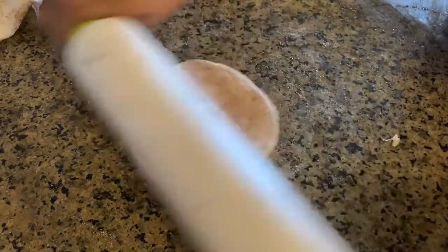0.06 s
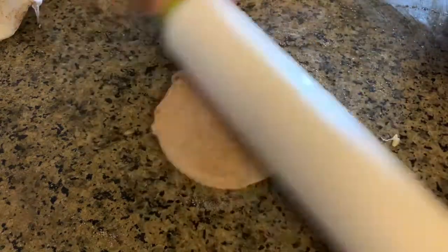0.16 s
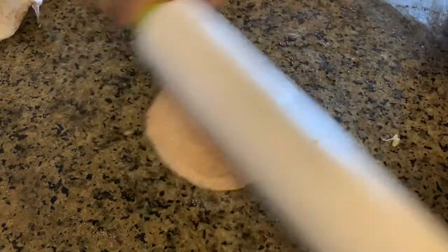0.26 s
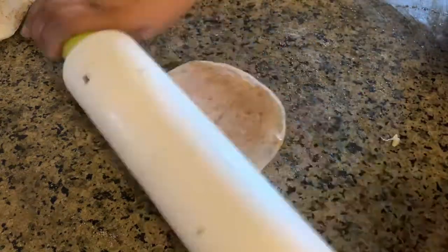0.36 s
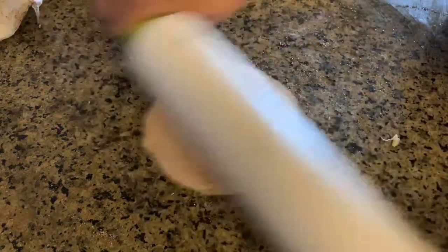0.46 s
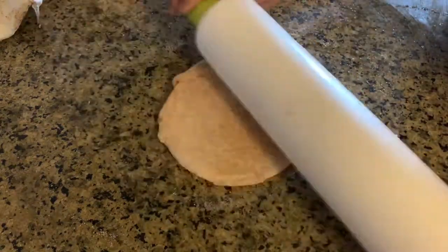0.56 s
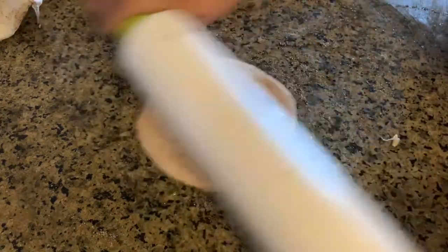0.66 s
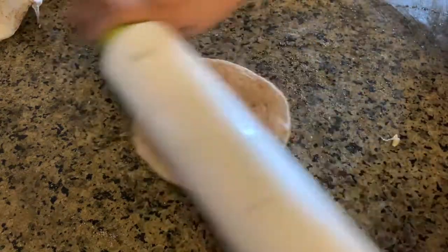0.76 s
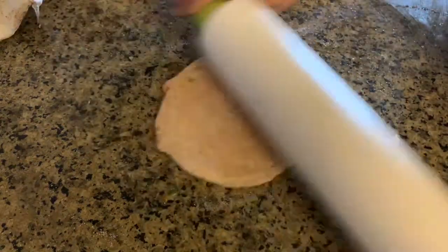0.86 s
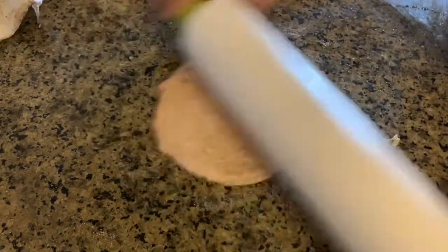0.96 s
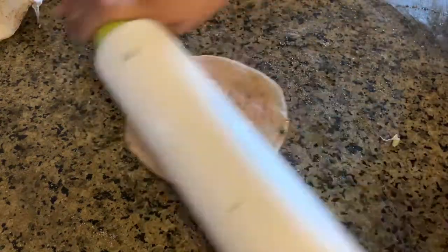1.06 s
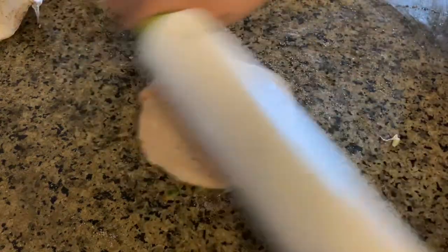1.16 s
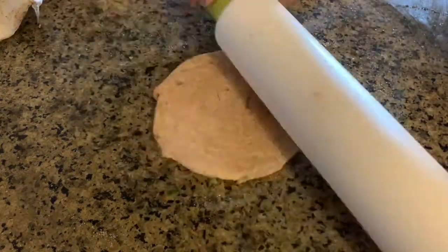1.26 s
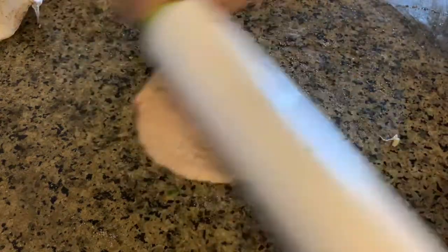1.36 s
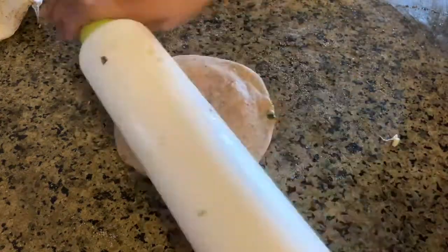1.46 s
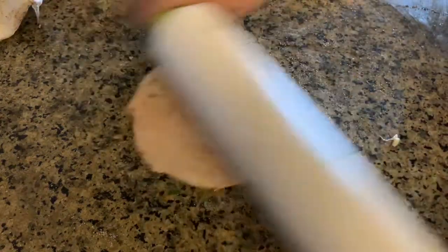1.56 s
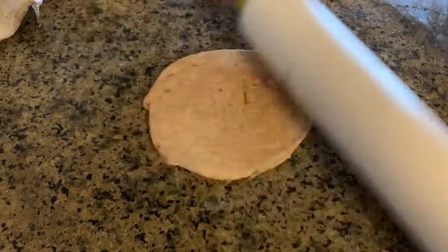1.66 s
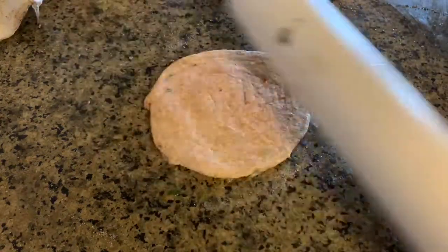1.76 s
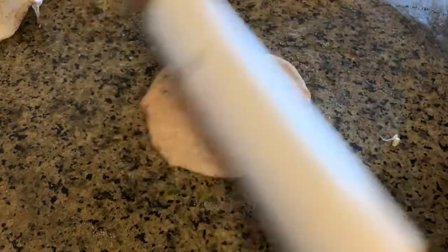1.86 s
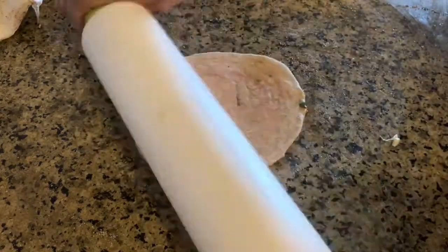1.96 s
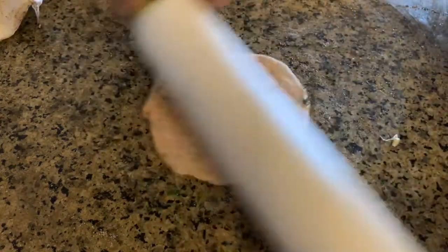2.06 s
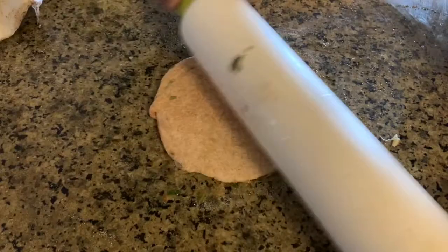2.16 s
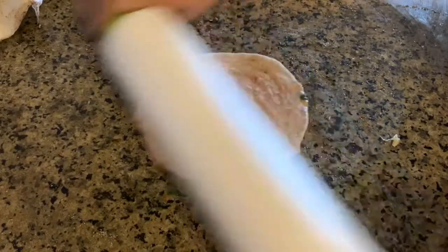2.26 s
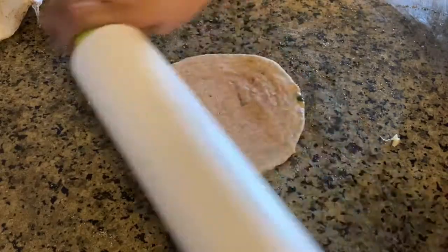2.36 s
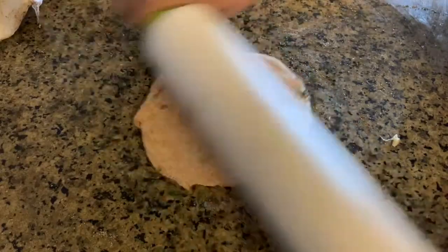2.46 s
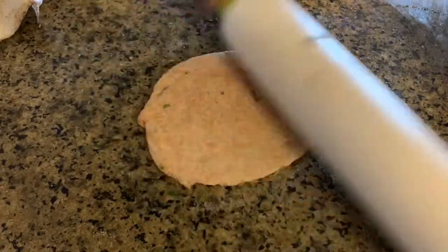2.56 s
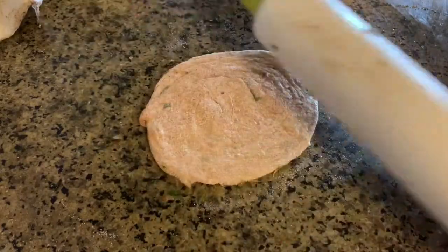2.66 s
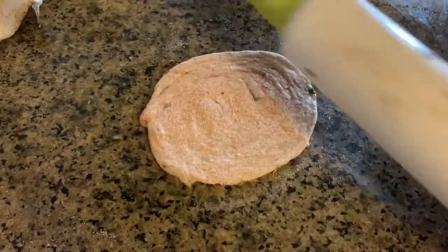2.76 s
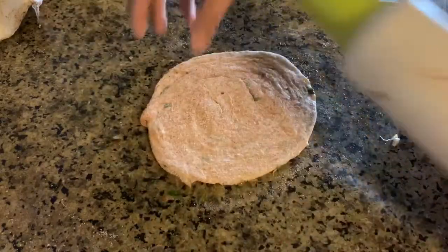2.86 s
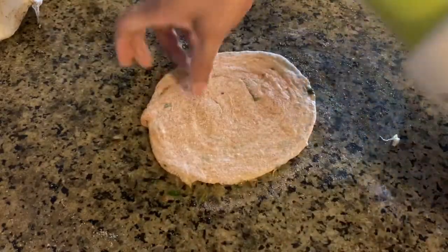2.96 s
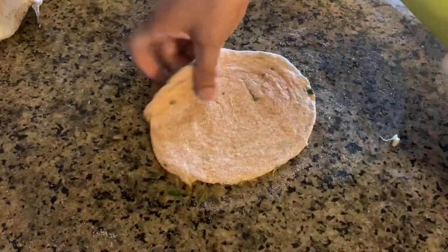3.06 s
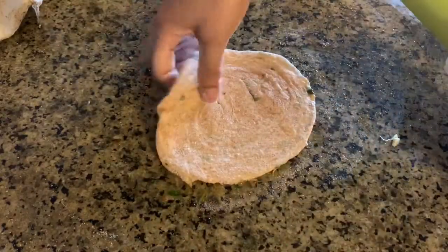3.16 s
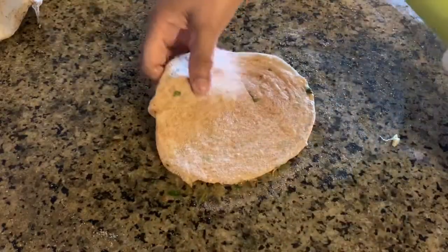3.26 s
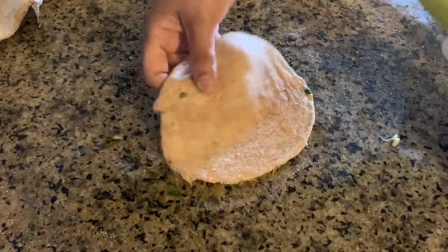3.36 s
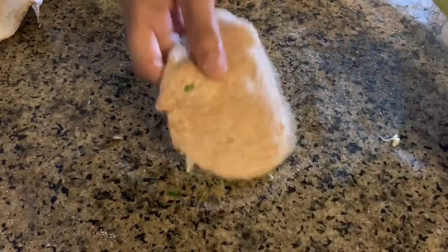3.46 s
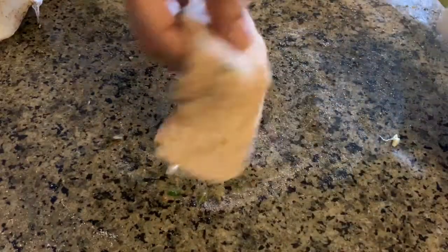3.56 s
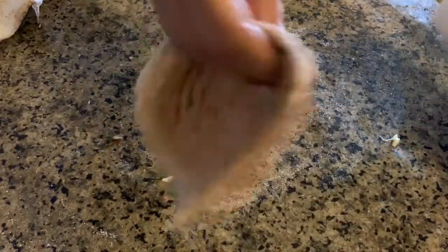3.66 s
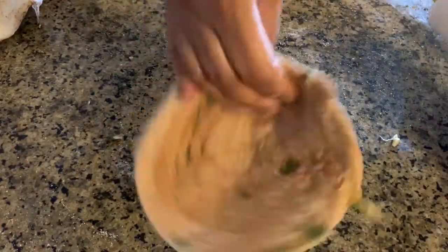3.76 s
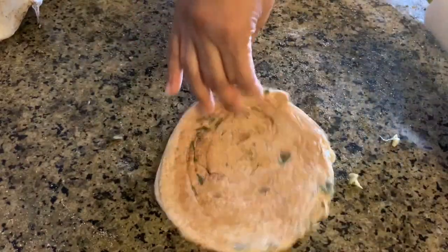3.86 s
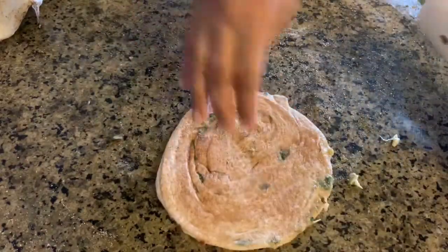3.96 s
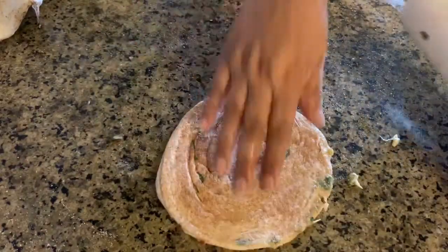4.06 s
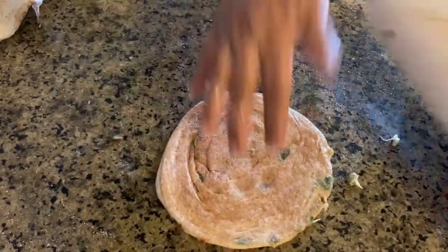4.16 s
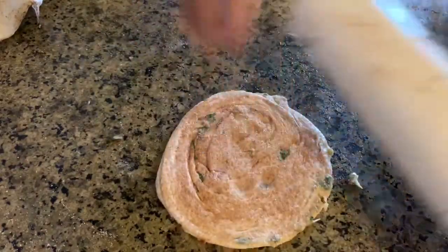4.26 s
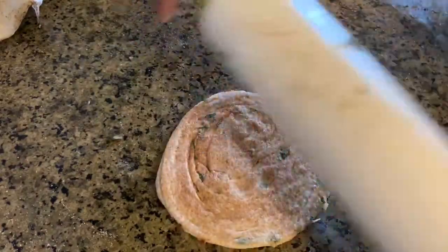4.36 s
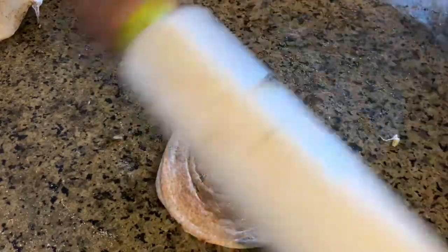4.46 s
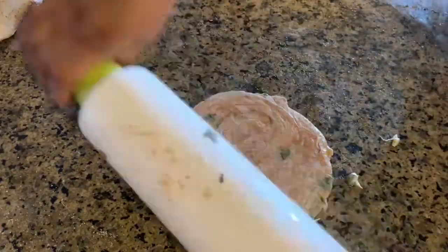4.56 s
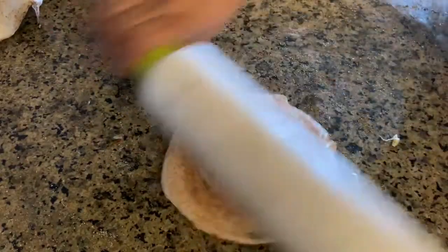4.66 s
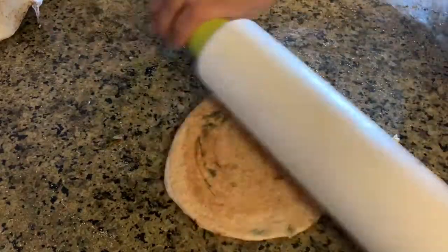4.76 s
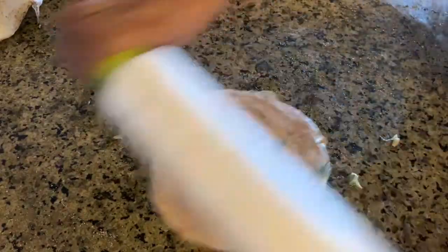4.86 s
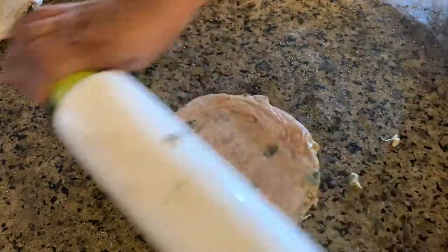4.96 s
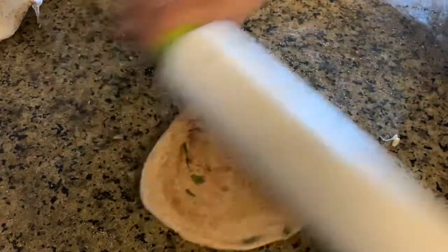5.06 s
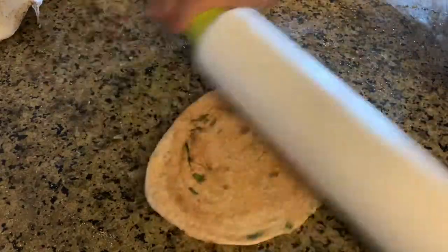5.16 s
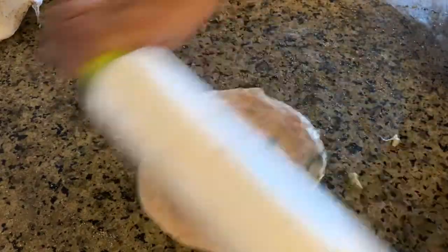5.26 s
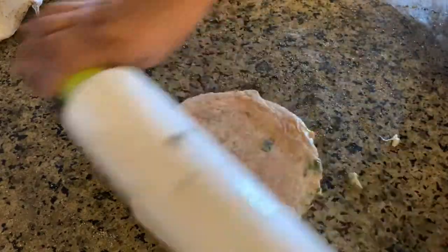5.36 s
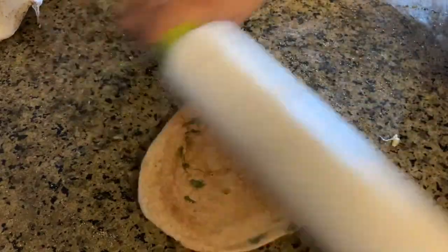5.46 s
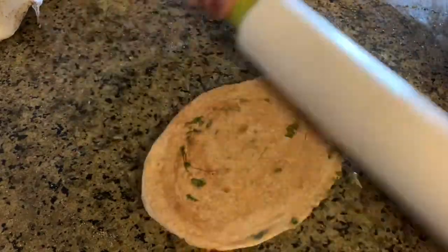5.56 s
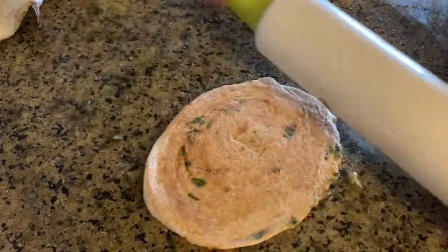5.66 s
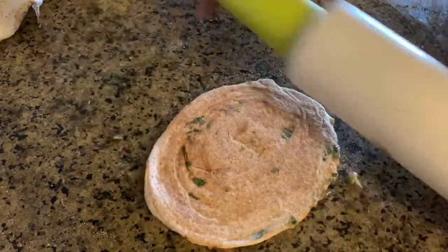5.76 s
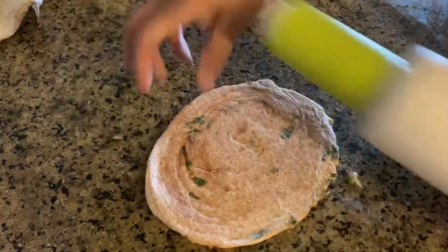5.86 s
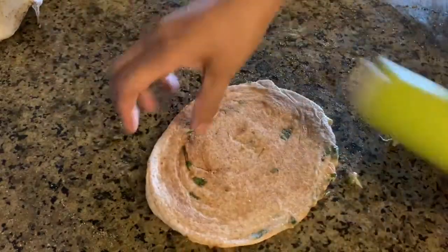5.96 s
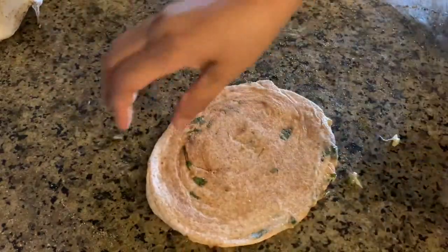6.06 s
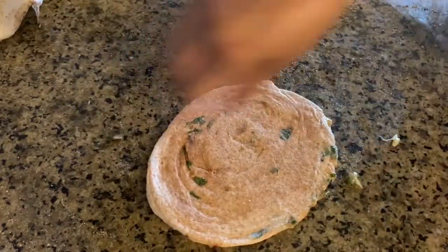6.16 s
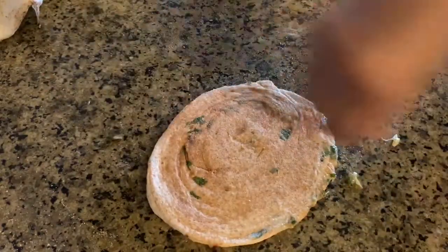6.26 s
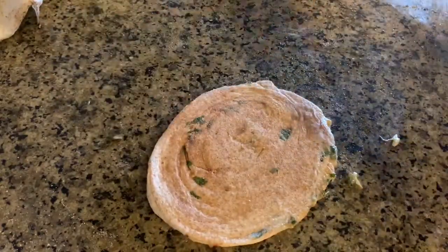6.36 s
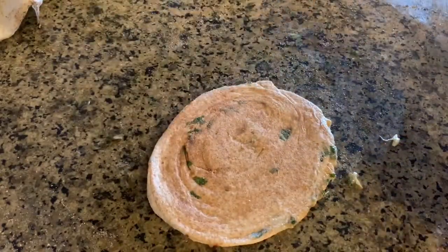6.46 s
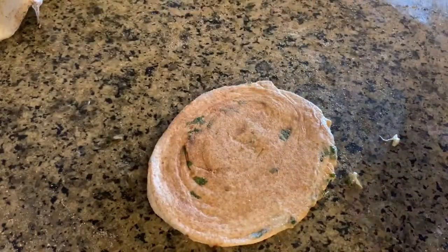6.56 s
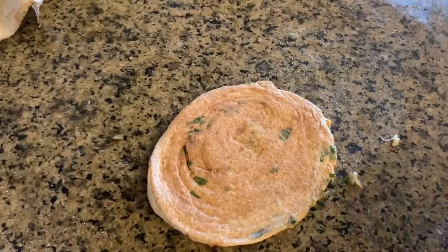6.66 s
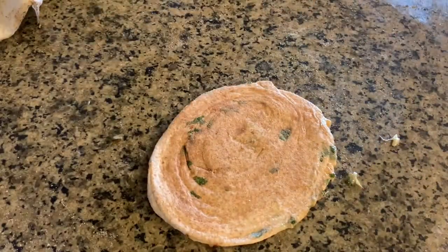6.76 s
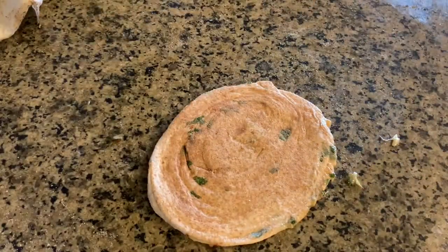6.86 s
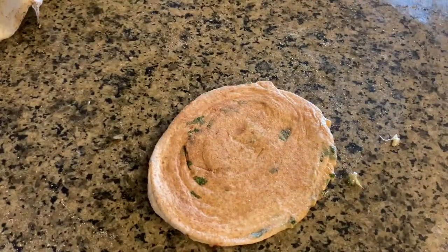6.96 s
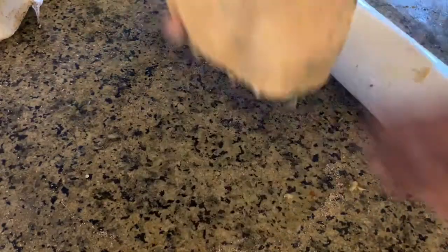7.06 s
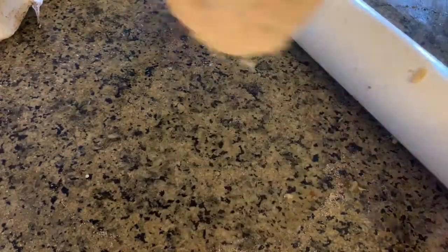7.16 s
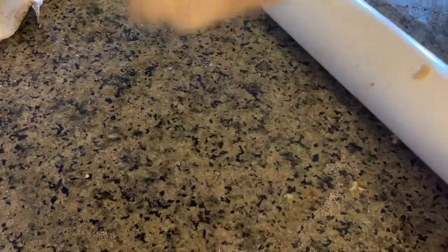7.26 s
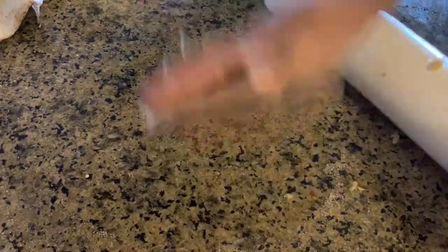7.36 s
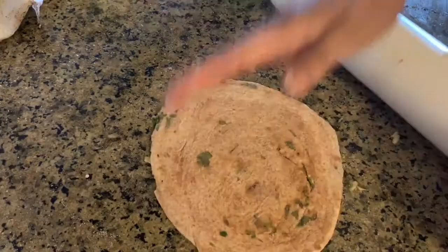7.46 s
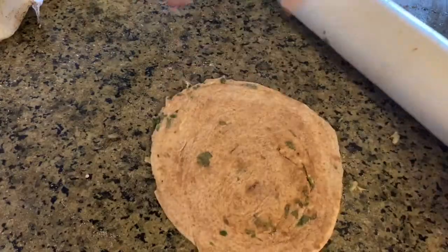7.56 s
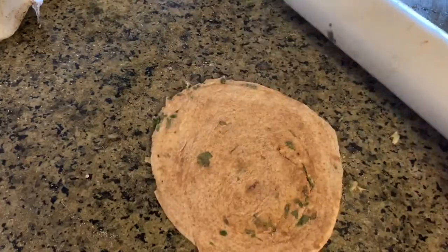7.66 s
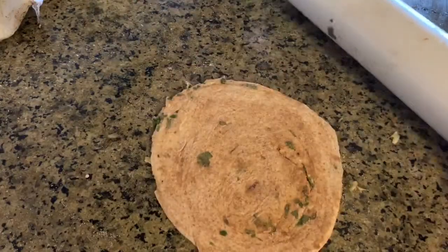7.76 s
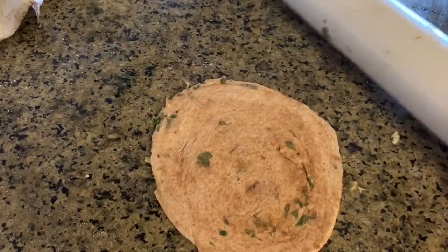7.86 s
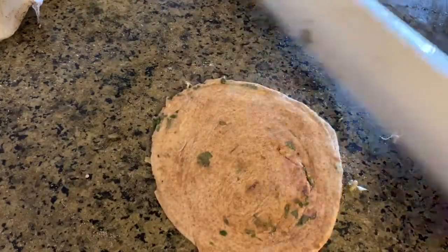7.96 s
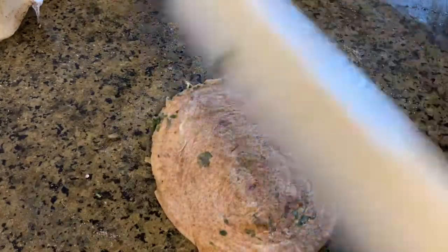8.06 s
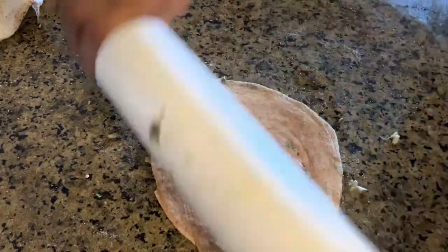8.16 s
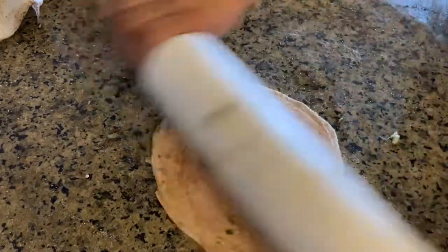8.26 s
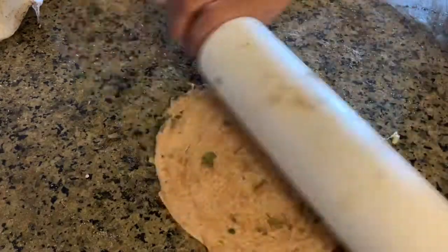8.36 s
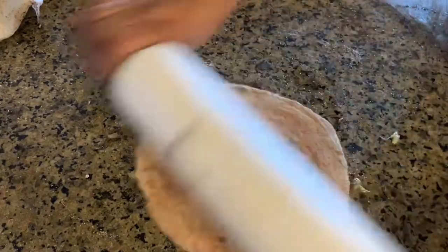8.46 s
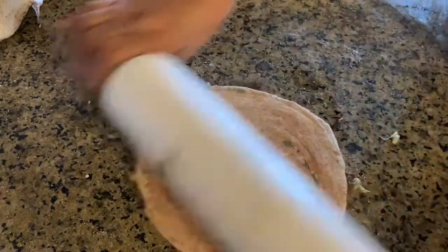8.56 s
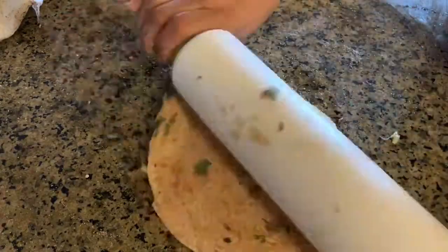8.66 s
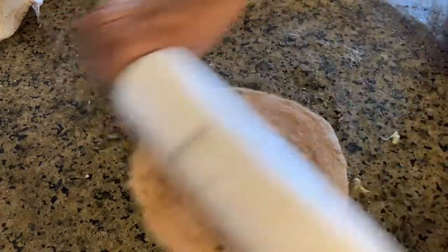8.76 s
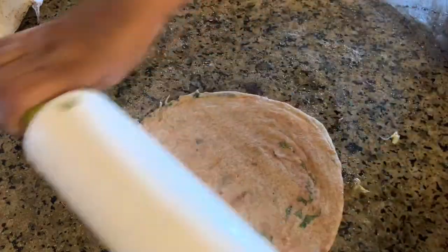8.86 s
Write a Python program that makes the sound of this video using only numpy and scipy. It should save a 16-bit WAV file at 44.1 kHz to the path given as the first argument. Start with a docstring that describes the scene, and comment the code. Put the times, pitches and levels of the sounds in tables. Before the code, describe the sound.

Quick back-and-forth rolling with rattling clacks and low thumps on stone, pauses of faint brushing, a flat dough slap, then a last short roll.

```python
"""A rolling pin with loose handles flattens floured dough on a stone kitchen counter, in three short runs.
Each stroke is filtered noise that swishes and rumbles; the barrel knocks on its axle and excites damped modes,
and air pockets snap in the dough as short bursts. After the first run the dough is peeled off and turned; after
the second it is peeled off again, the level dips briefly, and the dough is slapped down before the third run.
Throughout, an appliance hums as steady sines over low room noise."""
import sys
import numpy as np
from scipy import signal
from scipy.fft import rfft, irfft
from scipy.io import wavfile
from scipy.ndimage import uniform_filter1d

SR = 44100
rng = np.random.default_rng(int(sys.argv[2]) if len(sys.argv) > 2 else 0)


def unload_wav(signal):
    """Save mono or channel-first audio to the path in sys.argv[1] as 16-bit WAV at rate SR, clipped to [-1, 1]."""
    wavfile.write(
        sys.argv[1],
        SR,
        np.round(np.clip(np.atleast_2d(signal).T, -1, 1) * 32767).astype(np.int16),
    )


N = 392490

# Levels in the tables are relative to the gains of each layer.
# the pin rolls to and fro, one row a stroke: start_s, length_s, swish_db, extra_axle_chatter_db
STROKES = [(-0.12, 0.19, -39, 1), (0.07, 0.17, -38, -3), (0.242, 0.18, -39.5, 0), (0.422, 0.2, -38.5, -2.5),
           (0.607, 0.15, -39.5, 0.5), (0.771, 0.17, -37, 1.5), (0.953, 0.18, -41, -0.5),
           (1.133, 0.18, -37, 1), (1.321, 0.19, -40, 1.5), (1.503, 0.31, -38.5, -1),
           (1.869, 0.13, -35, 10.5), (2.02, .175, -38.5, -1.5), (2.192, 0.19, -39.5, -1),
           (2.4, 0.29, -38.5, -3), (2.67, 0.12, -43, -7), (4.4, .11, -47, -10), (4.537, 0.074, -48.5, -3),
           (4.617, 0.18, -37, 3), (4.81, 0.18, -38, 1.5), (4.996, 0.19, -35.5, 1.5), (5.182, 0.21, -40, 2),
           (5.391, 0.3, -38, 0.5), (5.67, 0.11, -44.5, -7), (7.73, .11, -41.5, -2),
           (7.812, 0.18, -52.5, 12), (7.96, 0.26, -57.5, 1), (8.207, 0.18, -38.5, -0.5),
           (8.378, 0.17, -39, 1.5), (8.549, 0.16, -41, 1.5), (8.711, 0.22, -39, 0)]
SPEED_UP_S, SLOW_DOWN_S, TURN_S = 0.15, 0.11, 0.015  # a stroke gathers speed and brakes; it overlaps the next at the turn
COAST_DB_PER_S = 45.5  # the push slackens along a stroke
CHATTER_POWER = 0.86  # the chatter follows the speed less keenly than the swish
RATTLES_PER_S = 40  # small random taps of the barrel on its axle
# spectra of rubbing and of axle chatter: frequency_hz, level_db
SWISH_SPECTRUM = [(300, -45), (1200, -8.5), (2300, 0), (3200, 1.5), (5200, -2), (7200, 2), (8200, -0.5),
                  (10300, 1), (13000, -0.5), (15500, -3.5)]
CHATTER_SPECTRUM = [(150, -14.5), (350, 4.5), (550, -1), (720, 7), (970, 3.5), (1150, 4.5), (1500, 7.5),
                    (1900, 17.5), (2300, -22.5), (2700, -2), (3500, -17.5), (8000, -37.5)]

# the arms bear down where the barrel climbs onto the dough: start_s, length_s, rumble_db
PRESSES = [(0.111, 0.13, -32.5), (0.489, 0.1, -27.5), (0.824, 0.16, -33), (1.141, 0.2, -33),
           (1.552, 0.13, -28.5), (2.092, .13, -39), (2.445, 0.093, -34.5), (4.70, 0.15, -38),
           (4.85, 0.2, -49.5), (5.045, 0.13, -33.5), (5.44, 0.13, -35), (7.86, 0.087, -35.5),
           (8.225, 0.041, -36), (8.79, 0.064, -51)]
PRESS_RISE_S, PRESS_FALL_S = 0.037, 0.092
# spectra of the shaken counter and of the barrel bumping over lumps: frequency_hz, level_db
RUMBLE_SPECTRUM = [(22, -37.5), (40, -10.5), (58, 3), (80, -2.5), (125, -2.5), (180, -13), (300, -24),
                   (500, -34.5), (1000, -54), (3000, -68.5)]
BUMP_SPECTRUM = [(100, -13), (220, 1), (400, -0.5), (600, -2.5), (1000, -21.5), (2000, -18.5)]

# the barrel knocks on its axle: start_s, strength_db, hardness_db, free_ringing_db
KNOCKS = [(0.11, -48, -5, -4), (0.274, -57, 2, 10), (0.771, -49.5, -15, -3), (1.554, -49.5, -1, 7.5),
          (1.70, -52.5, 7, 7.5), (1.721, -43.5, 2, -4.5), (1.758, -47.5, -2, -1), (1.796, -47, 4, 2),
          (1.8841, -30.5, 8.5, 1.5), (2.226, -52.5, 0.5, 5.5), (2.443, -49, 2.5, -9.5),
          (2.573, -35.5, -2, -35), (2.635, -37, -1, -5), (3.004, -56, -13, -12), (4.382, -46, -12, -16),
          (4.447, -41, -11.5, -28), (4.618, -34.5, 2.5, -7.5), (5.598, -39, -4, -27),
          (5.654, -30.5, -2.5, -34), (7.736, -47.5, -27, -15), (7.846, -51, 8.5, 2), (7.908, -43, -16, -11),
          (8.074, -45, -22, -8.5), (8.2159, -40.5, 4.5, -9), (8.625, -50.5, -1.5, -11)]
STRIKE_SPREAD_DB = 4  # no two knocks land on the same spot, so the modes share them differently
# modes of the free barrel, and of the handles, which ring with every knock: frequency_hz, level_db, t60_s
BARREL_MODES = [(390.7, -14, .22), (534, -1, 0.18), (596.5, -3.5, 0.5), (1019.5, -2, 0.15),
                (1730, -13, 0.13), (1996, -15, 0.12), (2000, -15.5, .08), (2537, -22, 0.14),
                (2660, -21, 0.23)]
HANDLE_MODES = [(728, -1, 0.43), (960, -2, 0.24), (960, 3.5, 0.26), (1272, -7, 0.32)]
# registers of a knock, from hollow to sharp: frequency_hz, level_db
KNOCK_SPECTRUM = [(100, -19.5), (250, -5), (550, -0.5), (700, -3), (950, 4.5), (1120, -13), (1350, -2.5),
                  (1800, -22), (3000, -35.5), (6000, -57.5)]
CLACK_SPECTRUM = [(600, -34.5), (1200, -20), (1550, 0.5), (1750, 13), (1900, 12.5), (2100, -7.5),
                  (2400, -7.5), (6000, -37.5)]
EDGE_SPECTRUM = [(900, -29), (2000, -29.5), (2700, 6), (4500, -4.5), (6000, -17.5), (14000, -16.5)]

# soft blows of pin, hand or dough on the counter: start_s, boom_db, firmness_db
THUDS = [(1.889, -29.5, -6), (2.11, -31, -50), (3.377, -55.5, 2), (3.862, -41, -2), (4.114, -37.5, -43),
         (4.378, -45, -0.5), (4.628, -39.5, 5), (5.115, -25.5, -12), (7.228, -43, 5), (7.442, -30, -4.5),
         (8.226, -39, -10.5)]
CLIMB_THUD_DB = -11.5  # meeting the dough's edge, relative to the rumble_db of the press
KNOCK_DRONE_DB = -12  # the cabinet answers every knock
# low and upper modes of counter and cabinet, and the cabinet's longest mode: frequency_hz, level_db, t60_s
BOOM_MODES = [(60.8, 6.5, 0.36), (67, -3, 0.37), (86.4, -8.5, 0.26)]
UPPER_BOOM_MODES = [(107, 1, 0.14), (148, -3, 0.24), (175, 5.5, .12), (215, -3.5, 0.2), (312, -6.5, 0.1)]
DRONE_MODES = [(119.6, 0, 0.79)]

# air pockets snap and the dough's skin smacks: start_s, level_db
SNAPS = [(0.487, -36.5), (0.5503, -34.5), (0.889, -45), (1.878, -45), (2.084, -45), (2.131, -38.5),
         (2.4841, -37), (3.72, -73), (3.858, -46.5), (3.917, -59), (4.102, -69), (4.3767, -55),
         (4.614, -43), (4.697, -40.5), (4.917, -45), (5.1068, -43), (5.129, -43), (7.156, -73),
         (7.216, -72), (7.28, -58), (7.4021, -64), (7.435, -32), (7.849, -47)]
SNAP_S = 0.034  # t60 of a snap's flurry
# the dough lands flat: start_s, level_db
SLAPS = [(3.856, -46.5), (7.403, -39), (7.437, -14)]
# spectra of a snap and of a slap: frequency_hz, level_db
SNAP_SPECTRUM = [(200, -9), (700, 8), (3000, 4), (7000, 6), (11000, 8), (16000, -7)]
SLAP_SPECTRUM = [(100, -3), (350, -21.5), (510, -4.5), (720, -4), (1100, -4.5), (1450, 1), (1700, -13),
                 (2150, -12.5), (3000, -28), (6000, -40), (14000, -79)]
# things standing on the counter ring after a slap: frequency_hz, level_db, t60_s
UTENSIL_MODES = [(207.5, -1, 0.44), (507, 1, 0.42), (1020, -16, 0.96), (1210, 5, 0.33), (1360, 2, 0.68),
                 (1355, -13.5, 0.55), (1453, -22, 0.46), (1410, 13, 0.18), (2090, -22, 0.48),
                 (2320, -24, 0.17)]

# hands and dough brush over the counter: start_s, length_s, rub_db, flour_hiss_db
RUBS = [(2.953, .11, -67, -73.5), (3.058, 0.14, -75.5, -72), (3.199, 0.12, -72, -71.5),
        (3.333, 0.31, -78.5, -74.5), (3.59, 0.15, -75, -75), (3.722, 0.29, -76, -63),
        (3.837, 0.11, -52, -53), (4.123, 0.071, -70, -70), (6.012, 0.18, -67.5, -80.5),
        (6.349, 0.091, -67.5, -90), (6.485, .13, -60, -77), (6.611, 0.16, -64, -74.5),
        (6.793, 0.11, -62, -68), (6.899, 0.13, -57, -75), (7.211, 0.054, -63, -80),
        (7.255, 0.1, -59.5, -63.5), (7.384, 0.1, -43.5, -46), (7.61, 0.044, -59, -65)]
RUB_RISE_S, RUB_FALL_S, RUB_EASE_DB_PER_S = 0.024, 0.034, 18
# spectra of a dull rub, of brushing and of flour: frequency_hz, level_db
RUB_SPECTRUM = [(150, -19), (400, 7), (700, -2), (1300, 4), (2000, -8), (5000, -46)]
BRUSH_SPECTRUM = [(400, -35), (1300, 5), (2200, 3.5), (5200, -3), (7500, -13), (9500, -18.5)]
FLOUR_SPECTRUM = [(4000, -16), (7500, -3.5), (11000, -5), (16000, -8)]

# decay of the kitchen's reverberation: frequency_hz, t60_s
KITCHEN_DECAY = [(100, 0.41), (500, 0.37), (1400, 0.49), (4000, 0.37), (9000, 0.42), (16000, 0.25)]
# near reflections and far reverberation: frequency_hz, level_db
NEAR_SPECTRUM = [(60, -32.5), (250, 3), (700, -5.5), (2000, 6), (5300, 10), (6800, 1), (9000, -27),
                 (16000, -24)]
FAR_SPECTRUM = [(60, -4), (250, -10.5), (1300, -9.5), (5000, -1), (7000, -14), (9000, -20.5),
                (16000, -21.5)]
# likeness of left and right: frequency_hz, correlation (0 to 1)
LIKENESS = [(100, 0.93), (250, 0.82), (700, 0.23), (1400, 0), (5500, 0.27), (6800, 0.23), (8300, 1),
            (16000, 0.89)]
# level difference between the sides: frequency_hz, left_minus_right_db
BALANCE = [(60, 4), (130, 1), (250, -0.5), (550, 3.5), (1000, 3.5), (2000, 2), (4500, -2.5), (7000, -0.5)]
# time by which left lags right: frequency_hz, lag_s
PORT_LAG = [(5500, -.00022), (6000, .000167), (8450, .000177), (11000, .000186)]

# spectrum of the room noise: frequency_hz, level_db
FLOOR_SPECTRUM = [(15, -40), (25, -2), (53, -2), (85, -9), (123, -0.5), (229, -16.5), (326, -12.5),
                  (591, -23), (936, -20), (2480, -36.5), (5140, -46), (7310, -46), (8590, -58),
                  (10400, -42.5), (13200, -48.5), (16000, -53)]
# hum and faint whine of the appliance: frequency_hz, rms_level_db
HUM = [(60, -61), (120, -65), (5220, -95)]


def rolling(swish_db=1.0, chatter_db=-12, ring_db=-18, grit_db=-9, rattle_db=-14, damped=0.42):
    """Rolling friction: the barrel rubs smoothly, crushes flour grains, and chatters on its axle."""
    turning = speed()
    rub = unit(rng.standard_normal(N) + amp(grit_db) * grains(900, 3.1))
    swish = amp(swish_db) * unit(colour(rub, SWISH_SPECTRUM)) * turning * waver(rate_hz=51, depth_db=1.1)
    slips = grains(600, 3.8) * speed(looseness=1) ** CHATTER_POWER

    # pressed into the dough, the barrel rings only briefly
    modes = ring([(hz, db, t60 * damped) for hz, db, t60 in BARREL_MODES])
    impulse = np.eye(1, SR)[0]
    body = colour(impulse, CHATTER_SPECTRUM)
    response = amp(chatter_db) * body / np.linalg.norm(body)
    response += amp(ring_db) * modes / np.linalg.norm(modes)
    chatter = signal.fftconvolve(slips, response)[:N]

    taps = grains(RATTLES_PER_S, 1.7)
    rattle = amp(rattle_db) * unit(colour(taps, KNOCK_SPECTRUM)) * turning
    return swish + chatter + rattle


def rumble(rumble_db=-1, bump_db=-13, light_roll_db=-6):
    """Forced vibration: lumps shake the counter under the weight of the arms, and bump the barrel."""
    weight = level(PRESSES, PRESS_RISE_S, PRESS_FALL_S) + amp(light_roll_db) * speed()
    lumps = colour(grains(500, 4.9), RUMBLE_SPECTRUM)
    local_power = abs(uniform_filter1d(lumps ** 2, size=1800))
    lumps /= np.sqrt(local_power + 1e-12)
    bumps = unit(colour(grains(140, 2.1), BUMP_SPECTRUM))
    return (amp(rumble_db) * lumps + amp(bump_db) * bumps) * weight


def knocks(knock_db=0, clack_db=1.0, edge_db=-11, ring_db=0, handle_db=-12):
    """Impact excitation: the axle contact rattles in three registers and sets barrel and handles ringing."""
    out = np.zeros(N)
    for start, db, hard_db, free_db in KNOCKS:
        rattle = burst(t60=0.052, contact=0.6)
        # a harder contact has more of the two upper registers
        registers = (
            (knock_db, KNOCK_SPECTRUM),
            (clack_db + hard_db, CLACK_SPECTRUM),
            (edge_db + hard_db, EDGE_SPECTRUM),
        )
        for share_db, spectrum in registers:
            add(out, start, amp(db + share_db) * blow(colour(rattle, spectrum)))
        barrel = amp(ring_db + free_db) * struck(BARREL_MODES)
        handles = amp(handle_db) * struck(HANDLE_MODES)
        add(out, start, amp(db) * (barrel + handles))
    return out


def thuds(boom_db=1, upper_db=0, climb_firm_db=4, free_drone_db=-5):
    """Modal response: soft blows set the low modes of counter and cabinet booming."""
    out = np.zeros(N)
    push = np.hanning(90)  # dough cushions the blow
    low = blow(signal.fftconvolve(ring(BOOM_MODES), push))
    upper = blow(signal.fftconvolve(ring(UPPER_BOOM_MODES), push))
    drone = blow(signal.fftconvolve(ring(DRONE_MODES), push))
    climbs = [(start, db + CLIMB_THUD_DB, climb_firm_db) for start, _, db in PRESSES]
    for start, db, firm_db in list(THUDS) + climbs:
        add(out, start, amp(db) * (amp(boom_db) * low + amp(upper_db + firm_db) * upper))
    for start, db, _, free_db in KNOCKS:
        drone_gain = amp(KNOCK_DRONE_DB) + amp(free_drone_db + free_db)
        add(out, start, amp(db) * drone_gain * drone)
    return out


def dough(snap_db=1, clap_db=-3, utensils_db=-20):
    """Transient radiation: trapped air snaps brightly; the landing sheet claps and shakes utensils."""
    out = np.zeros(N)
    shaken = blow(ring(UTENSIL_MODES))
    for start, db in SNAPS:
        add(out, start, amp(snap_db + db) * blow(colour(burst(SNAP_S, contact=1.0), SNAP_SPECTRUM)))
    for start, db in SLAPS:
        clap = blow(colour(burst(t60=0.052, contact=1.0), SLAP_SPECTRUM))
        add(out, start, amp(db + clap_db) * clap)
        add(out, start, amp(db + utensils_db) * shaken)
    return out


def hands(rub_db=-4, brush_db=-3, flour_db=-1):
    """Granular friction: skin and dough brush over dry flour in many tiny impacts."""
    shape = (RUB_RISE_S, RUB_FALL_S, RUB_EASE_DB_PER_S)
    touch = level([(start, length, db) for start, length, db, _ in RUBS], *shape)
    dust = level([(start, length, db) for start, length, _, db in RUBS], *shape)
    rub = amp(rub_db) * unit(colour(grains(3900, 2.0), RUB_SPECTRUM))
    brush = amp(brush_db) * unit(colour(grains(6000, 2.7), BRUSH_SPECTRUM))
    flour = amp(flour_db) * unit(colour(grains(4000, 2.3), FLOUR_SPECTRUM))
    return ((rub + brush) * touch + flour * dust) * waver(rate_hz=15, depth_db=2.5)


def kitchen(x, near_t60=0.039, far_db=-2):
    """Room acoustics: direct sound, early scatter, late reverberation, and a lag between two ports."""
    hz, near = diffuse(SR)
    after_direct = np.arange(SR) > 30
    near = irfft(near, SR) * fade(near_t60) * after_direct

    # the far field builds up over 9.9 ms and decays at its own rate in each band
    f, t, z = signal.stft(irfft(diffuse(SR)[1], SR), SR, nperseg=256)
    decay = np.exp(-np.log(1000) * t / read(KITCHEN_DECAY, f)[:, None])
    build_up = np.minimum(t / 0.0099, 1)
    far = signal.istft(z * decay * build_up, SR)[1][:, :SR]

    paths = 1 + amp(read(NEAR_SPECTRUM, hz)) * rfft(near / np.linalg.norm(near[0]))
    paths += amp(far_db + read(FAR_SPECTRUM, hz)) * rfft(far / np.linalg.norm(far[0]))
    # a long, moving source has no fixed comb colour in the room
    paths = rfft(np.array([even(path, size=70) for path in irfft(paths, SR)]))
    paths *= amp(np.outer([.5, -.5], read(BALANCE, hz)))
    paths[0] *= np.exp(-2j * np.pi * hz * read(PORT_LAG, hz))
    lead = 256  # samples of room for negative lags, cut off again below
    response = np.roll(irfft(paths, SR), lead, axis=1)
    return signal.fftconvolve(x[None], response, axes=1)[:, lead:lead + N]


def background(floor_db=-62):
    """Stationary sound: coloured room noise with the hum and faint whine of an appliance."""
    hz, z = diffuse(N)
    t = np.arange(N) / SR
    floor = amp(floor_db) * unit(irfft(z * amp(read(FLOOR_SPECTRUM, hz)), N))
    hum = sum(amp(db) * np.sqrt(2) * np.sin(2 * np.pi * (f * t + rng.random())) for f, db in HUM)
    return floor + hum


def speed(looseness=0):
    """Kinematics of the strokes: turning speed as a gain; looseness 1 weights it by the axle's chatter."""
    strokes = [
        (start - TURN_S / 2, length + TURN_S, db + looseness * loose_db)
        for start, length, db, loose_db in STROKES
    ]
    return level(strokes, SPEED_UP_S, SLOW_DOWN_S, COAST_DB_PER_S)


def level(events, rise_s, fall_s, sag_db_per_s=0):
    """Amplitude envelope of gestures (start_s, length_s, level_db): each swells, sags and dies away."""
    gain = np.zeros(N)
    for start, length, db in events:
        first = max(round(start * SR), 0)
        last = min(round((start + length) * SR), N)
        t = np.arange(first, last) / SR - start
        ramps = np.clip([t / rise_s, (length - t) / fall_s], 0, 1)
        add(gain, start, amp(db - sag_db_per_s * t) * np.sin(np.pi / 2 * ramps).prod(axis=0))
    return gain


def waver(rate_hz, depth_db):
    """Slow random modulation: a gain that wanders like the pressure of a hand."""
    hz = np.fft.rfftfreq(N, 1 / SR)
    slow = irfft(rfft(rng.standard_normal(N)) / (1 + (hz / rate_hz) ** 4), N)
    return amp(depth_db * unit(slow))


def grains(per_s, spread_db):
    """Random impulse train: tiny impacts of uneven size and either sign, scaled to rms 1."""
    size = amp(spread_db * np.minimum(rng.exponential(1, N), 4))
    return unit(size * rng.choice([-1, 1], N) * (rng.random(N) < per_s / SR))


def burst(t60, contact, size=8192):
    """Repeated contact: a first impact followed by a dying flurry of smaller, uneven ones."""
    x = rng.standard_normal(size) ** 3 * fade(t60)[:size]  # the cube makes them uneven
    x /= np.linalg.norm(x)
    x[0] += contact
    return even(x, size=45)


def struck(modes):
    """Mode participation: a body's ring when it is hit at a random spot."""
    spot_db = STRIKE_SPREAD_DB * rng.standard_normal(len(modes))
    return blow(ring([(hz, db + extra_db, t60) for (hz, db, t60), extra_db in zip(modes, spot_db)]))


def ring(modes):
    """Modal superposition: damped sines of a struck body."""
    t = np.arange(SR) / SR
    return sum(amp(db) * fade(t60) * np.sin(2 * np.pi * hz * t) for hz, db, t60 in modes)


def fade(t60):
    """Exponential decay over one second, falling 60 dB in t60 seconds."""
    return np.exp(-np.log(1000) * np.arange(SR) / SR / max(t60, 1e-3))


def diffuse(size):
    """Interaural-style coherence: spectra of two noises whose likeness depends on frequency."""
    hz = np.fft.rfftfreq(size, 1 / SR)
    a, b = rfft(rng.standard_normal((2, size)))
    same = np.clip(read(LIKENESS, hz), -1, 1)
    return hz, np.array([a, same * a + np.sqrt(1 - same ** 2) * b])


def colour(x, spectrum, size=8192):
    """Linear filtering: a causal filter with the given spectrum."""
    gain = amp(read(spectrum, abs(np.fft.fftfreq(size, 1 / SR))))
    response = np.fft.ifft(causal(gain)).real[:size // 2]
    return signal.fftconvolve(x, response)[:len(x)]


def causal(gain):
    """Minimum phase: response of the quickest filter with these gains (one for each FFT bin)."""
    return np.exp(np.conj(signal.hilbert(np.log(gain))))


def even(x, size):
    """Spectral whitening: evens the gain of a scatter of taps, averaged over `size` bins."""
    z = np.fft.fft(x)
    power = uniform_filter1d(abs(z) ** 2, size=size, mode="wrap")
    return np.fft.ifft(z / causal(np.sqrt(abs(power) + 1e-12))).real


def read(points, hz):
    """Interpolation of a table on a logarithmic frequency axis."""
    f, value = np.transpose(points)
    return np.interp(np.log(hz + 1), np.log(f + 1), value)


def add(mix, start, sound):
    """Superposition: adds a sound at a start time in seconds."""
    part = mix[max(round(start * SR), 0):][:len(sound)]
    part += sound[:len(part)]


def blow(x, size=882):
    """Normalisation of a blow to rms 1 over its first `size` samples."""
    return x / np.sqrt(np.mean(x[:size] ** 2) + 1e-20)


def unit(x):
    """Normalisation to rms 1."""
    return x / np.sqrt(np.mean(x ** 2) + 1e-20)


def amp(db):
    """Logarithmic level: decibels to gain."""
    return 10 ** (np.asarray(db) / 20)


def scene():
    """Superposition of all the work on the counter, heard in the kitchen over its background."""
    work = rolling() + rumble() + knocks() + thuds() + dough() + hands()
    return kitchen(work) + background()


def record(dry):
    """Band limitation: the level dips briefly once, then a low cut and a high cut bound the spectrum."""
    low_cut_hz, high_cut_hz = 43, 15900
    dip = np.interp(np.arange(N) / SR, [7.002, 7.009, 7.02, 7.032], [1, .08, .08, 1])
    low_cut = signal.butter(5, low_cut_hz, "highpass", fs=SR, output="sos")
    x = signal.sosfiltfilt(low_cut, dry * dip)
    high_cut = signal.firwin(301, high_cut_hz, window=("kaiser", 8), fs=SR)
    return signal.oaconvolve(x, high_cut[None], "same")


dry = scene()
out = record(dry)
unload_wav(out)
```